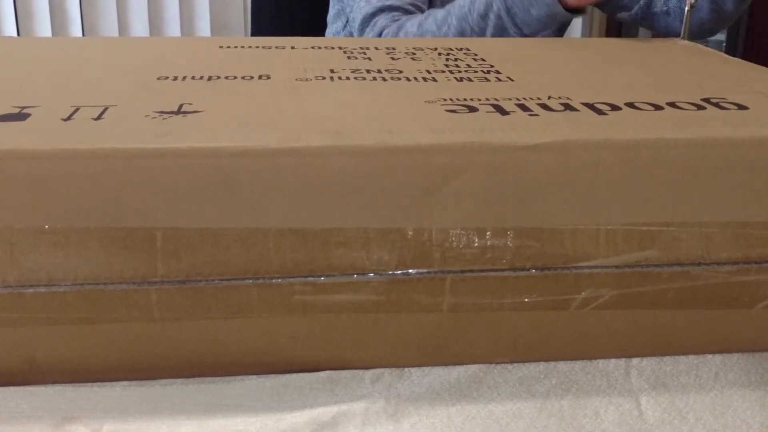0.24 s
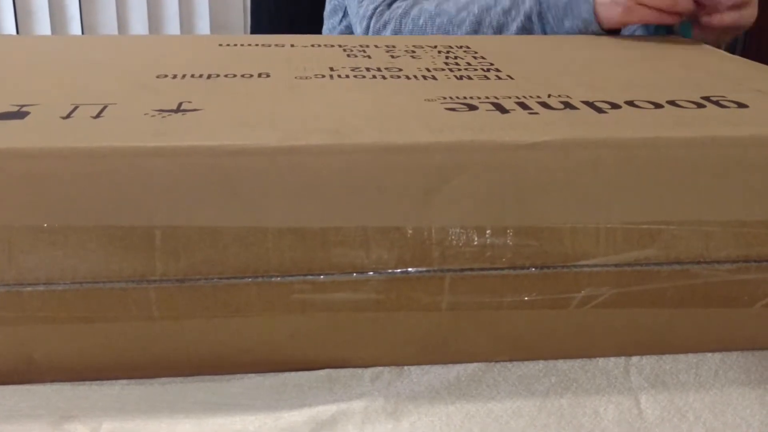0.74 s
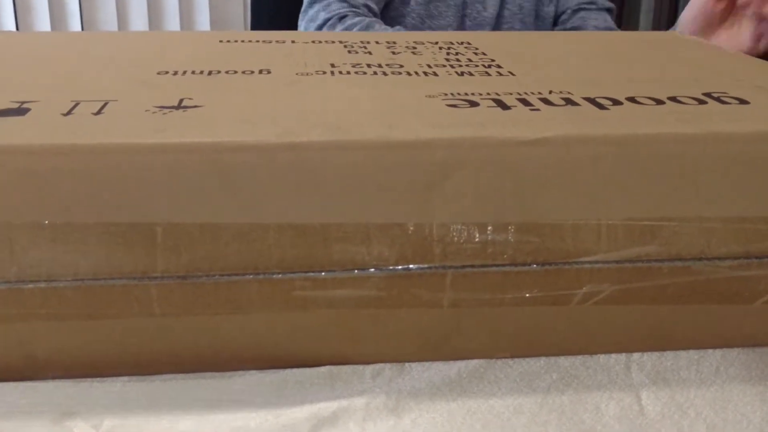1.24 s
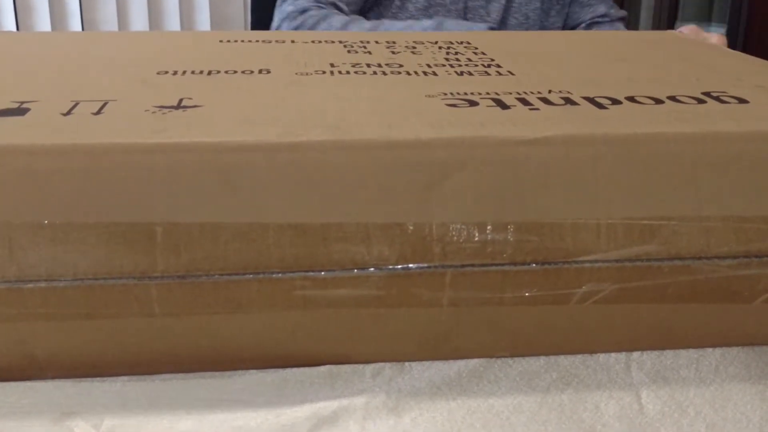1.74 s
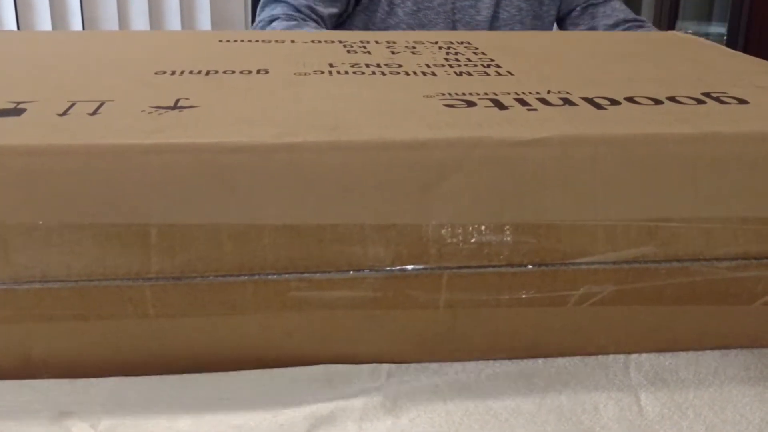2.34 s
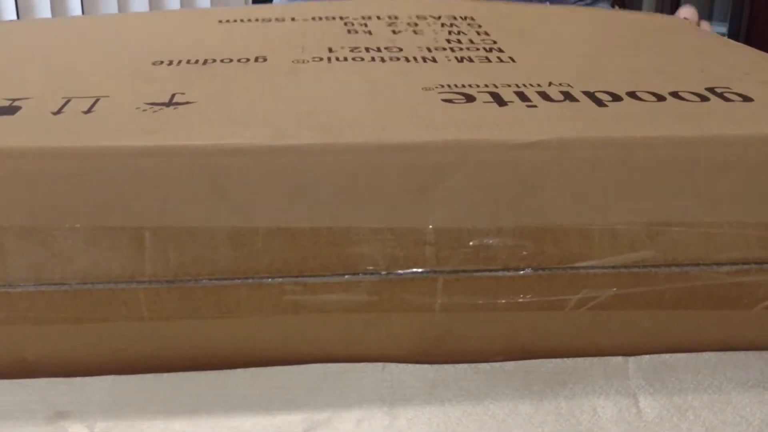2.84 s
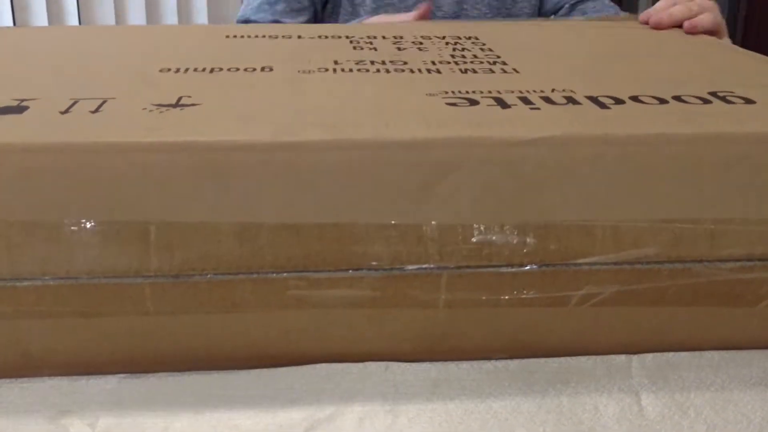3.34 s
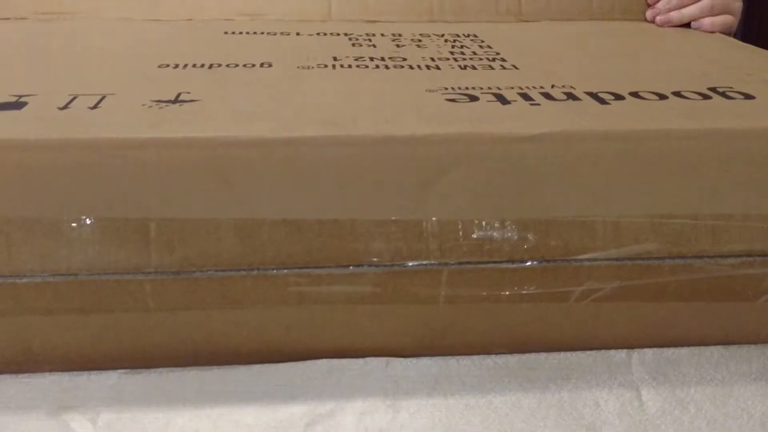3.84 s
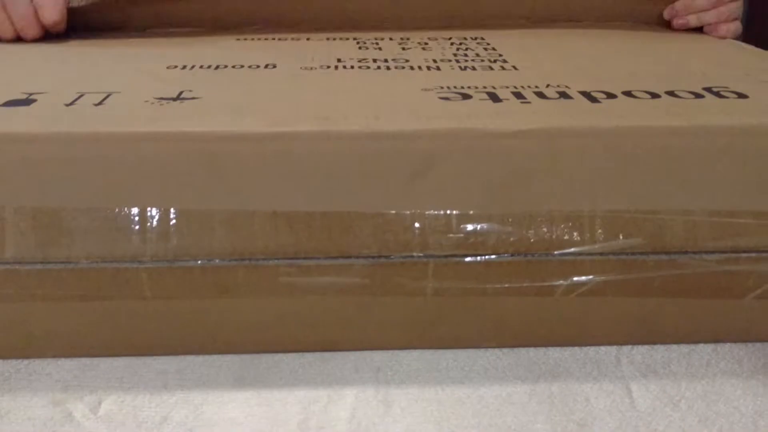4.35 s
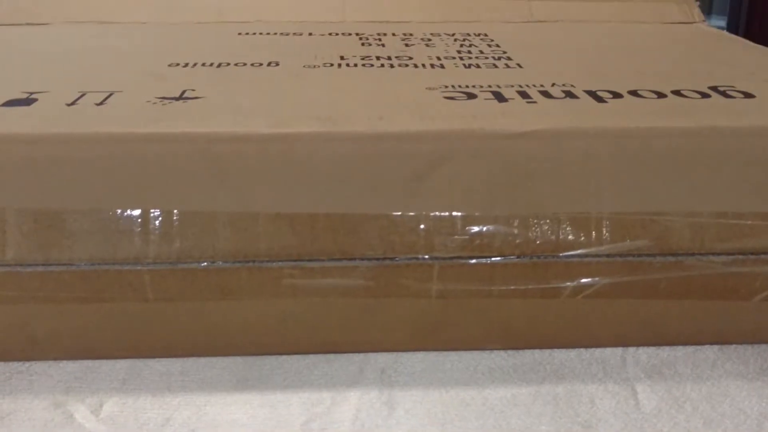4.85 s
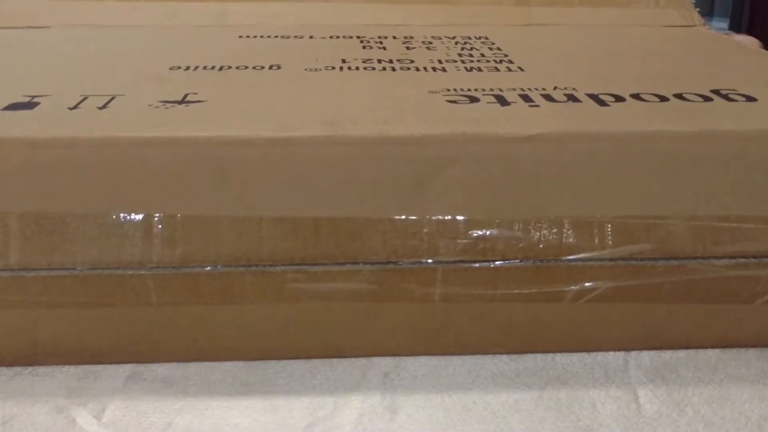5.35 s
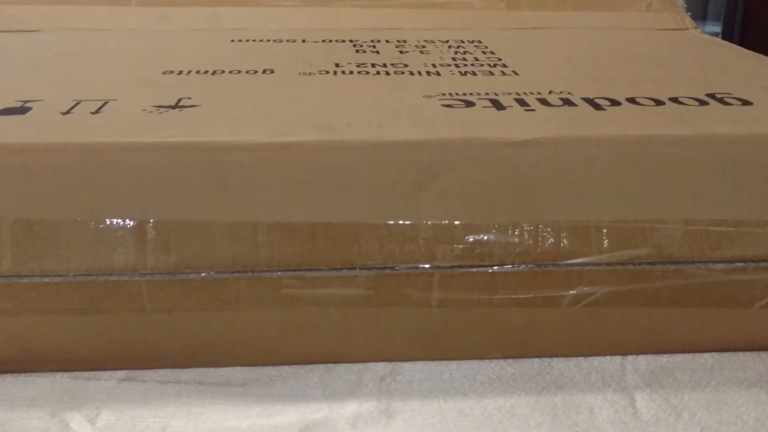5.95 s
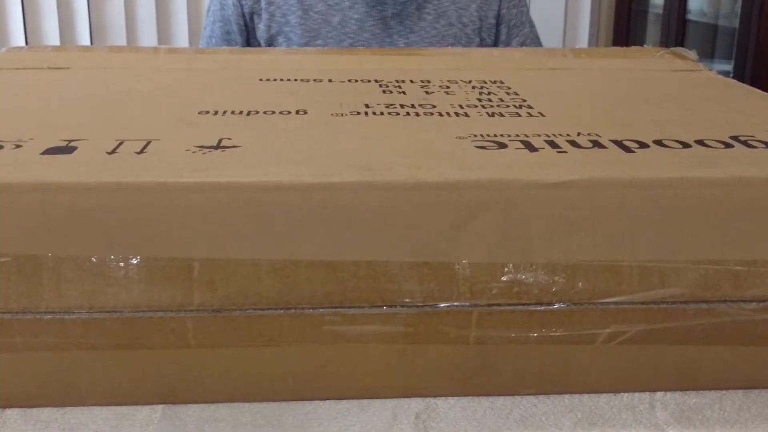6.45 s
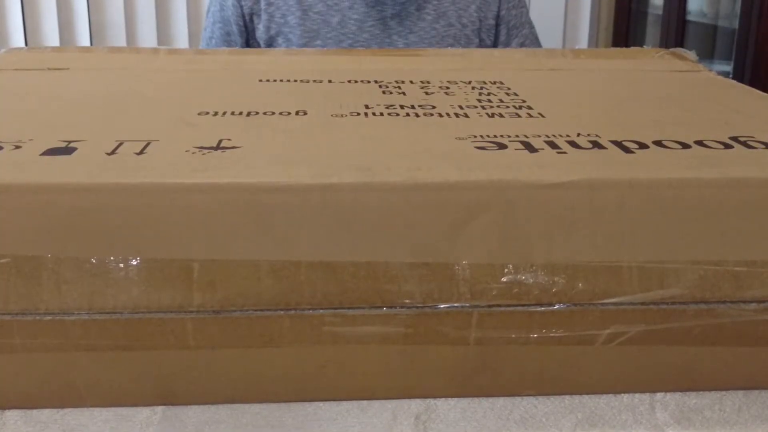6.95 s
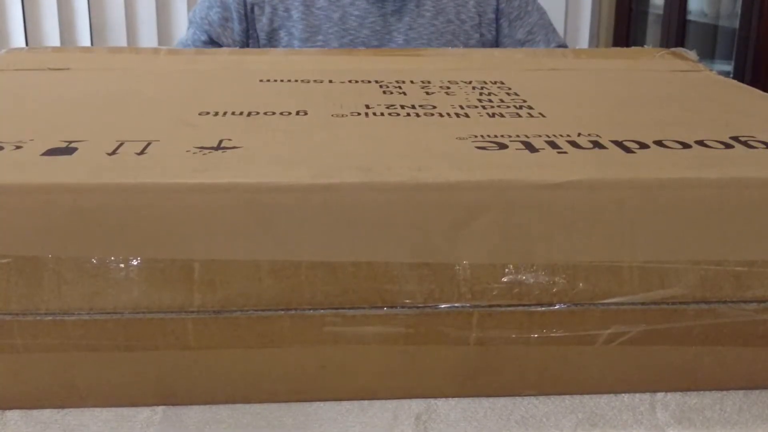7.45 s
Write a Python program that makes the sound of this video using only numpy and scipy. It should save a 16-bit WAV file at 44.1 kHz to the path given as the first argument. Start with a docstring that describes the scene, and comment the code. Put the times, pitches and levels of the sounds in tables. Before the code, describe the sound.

Close cardboard rubbing, a metal tool set down, then packing tape crackles and rips as box flaps creak and scrape open.

```python
"""A faint rub on cardboard rises to a squeak and a few bumps, then a steel tool clatters onto a table.
Hands are opening a taped box in a small room, close to a camera's two microphones. The board rubs in
countless tiny slips and booms when bumped; the tape crackles, snaps and tears; a flap groans as it
sticks and slips, then scrapes open. Behind it lie room tone, a thin electrical whine and a short echo.
The camera widens its stereo image by cross-feeding the microphones."""
import sys
import numpy as np
from scipy import signal
from scipy.fft import rfft, irfft, next_fast_len
from scipy.io import wavfile
from scipy.ndimage import uniform_filter1d, map_coordinates

SR = 44100
rng = np.random.default_rng(int(sys.argv[2]) if len(sys.argv) > 2 else 0)


def inscribe(sig):
    """Save sig as 16-bit PCM at rate SR to the path in sys.argv[1].

    A 1-D sig is mono; a 2-D sig holds one channel per row.
    Samples are clipped to [-1, 1] before scaling.
    """
    pcm = np.round(np.clip(np.atleast_2d(sig).T, -1, 1) * 32767)
    wavfile.write(sys.argv[1], SR, pcm.astype(np.int16))


N = 339129

# Noise spectra. Each row: frequency in Hz, relative density in dB.
ROOM_TONE_SPECTRUM = [(25, -4), (80, -2.5), (140, 6.5), (260, 4.5), (540, -2.5), (1050, -5.5),
                      (1400, -13.5), (2000, -15), (2900, -9.5), (3500, -20.5), (7000, -19), (11000, -26),
                      (15000, -31)]
SHIFT_SPECTRUM = [(100, -16), (220, -2), (300, -23), (410, -1.5), (520, -26), (1200, -46), (4000, -58)]  # the hollow box moving on the table
THUD_SPECTRUM = [(120, -16), (330, -8.5), (480, -6.5), (590, 4), (850, -12), (1300, -16), (2500, -16.5),
                 (6000, -54.5)]  # the table's dull body
CLATTER_SPECTRUM = [(200, -5), (700, -7.5), (1100, -7), (1600, 2.5), (2100, -2), (2800, -3.5),
                    (6000, -52.5)]  # tool against table
CLINK_SPECTRUM = [(1200, -32.5), (2400, 1), (3100, -5), (3900, 0.5), (5300, -9.5), (6600, -11),
                  (8000, -21.5), (15000, -32.5)]  # bright steel
TIP_SPECTRUM = [(1000, -26.5), (3000, -19), (3800, 3.5), (4150, 10), (4700, -14.5), (8000, -27),
                (15000, -33.5)]  # the tool's tip leaving the tape
FOLD_SPECTRUM = [(150, 7.5), (700, 7.5), (1900, -3.5), (3000, -21), (8000, -25)]  # a crease giving way
BOARD_SPECTRUM = [(100, -17), (300, -2), (550, 2), (800, -3), (1300, -5), (1800, -6.5), (2600, -24),
                  (4500, -26.5), (9000, -74.5)]  # cardboard rubbed or slapped
TAPE_SPECTRUM = [(700, -33), (1700, -2.5), (2700, -2.5), (4300, 4.5), (6000, -3), (7500, -7), (9500, -12),
                 (15000, -29)]  # tape rasping
PEEL_SPECTRUM = [(3000, -35), (6000, -1), (8500, -3.5), (12500, -5), (14500, -10.5), (16000, -6.5)]  # glue letting go

# A faint electrical whine. Each row: frequency in Hz, level in dB.
WHINE_TONES = [(5000, -68), (6000, -63), (7000, -66.5), (8335, -72), (10000, -75)]
# The background drops near 0.8 s and slowly creeps back. Each row: time in seconds, gain in dB.
BACKGROUND_GAIN = [(0, 1), (.78, 2.5), (1.05, -11), (1.5, -16.5), (3.8, -10.5), (5.9, 1), (7.69, 2.5)]
# The small room's echo. Each row: frequency in Hz, seconds to fall 60 dB.
ROOM_DECAY = [(120, 0.58), (500, 0.42), (1500, 0.28), (4000, 0.34), (12000, 0.2)]
# Table top and steel tool ringing. Each row: frequency in Hz, level in dB, seconds to fall 60 dB.
TABLE_MODES = [(335, -10, .42), (532, -2, .1), (592, -1, .075), (655, -4, .06), (765, -13, .09),
               (925, -9, .07), (1100, -13, .1), (1290, -8, .07)]
TOOL_MODES = [(1287, -8, .08), (1873, -6, .07), (2840, -4, .06), (2972, -3, .095), (3050, -13, .11),
              (3720, -14, .2), (5500, -22, .2), (6470, -21, .16)]
# The box's air cavity and panels. Each row: frequency in Hz, width in Hz, level in dB.
BOX_MODES = [(84.2, 200, -21.5), (140.5, 21, -3), (192.5, 16, -4.5), (244, 30, -3), (358, 62, -16)]

# The tool meets the table. Each row: start in seconds, relative levels of clatter, thud, tool ring
# and clink in dB, contact time in seconds.
TOOL_KNOCKS = [(0.7961, -7, -14.5, -14.5, -27, .0002), (0.818, -32, -22, -32, -48, .002),
               (0.8953, -4.5, -38, -27, -18, .0018), (0.9065, -3, -24, -24, -17, .0002),
               (0.976, -19, -36.5, -35, -40, 0.0035), (1.081, -40, -48, -47, -50, .004),
               (1.096, -31, -32.5, -52, -60, 0.006), (1.145, -33, -38.5, -56, -66, 0.005),
               (1.187, -29, -35, -56, -63, 0.0045), (1.305, -50, -47, -75, -74, 0.01),
               (1.8145, -40, -29.5, -55, -63, .003), (2.0976, -20.5, -25.5, -41, -56, 0.003)]
# Folds ticking as the flaps bend. Each row: start in seconds, relative level in dB.
FOLD_TICKS = [(3.851, -40), (3.937, -36.5), (3.981, -38), (4.006, -33), (4.112, -32), (4.13, -32),
              (4.153, -31.5), (4.179, -38), (4.22, -30.5), (4.248, -34), (4.394, -32.5), (4.454, -28),
              (4.461, -30.5), (4.516, -30), (6.098, -17), (6.2064, -23)]
# Blows and buckles of the box. Each row: start in seconds, relative slap level in dB, slap pitch in Hz,
# relative levels of thump and crack in dB, seconds for slap and crack to fall 60 dB.
BOX_BUMPS = [(0.461, -16.5, 684, -39.5, -32, 0.25), (0.523, -17.5, 361, -36.5, -37, 0.17),
             (0.589, -21.5, 474, -40, -26.5, 0.28), (2.493, -20.5, 990, -38, -29.5, 0.26),
             (2.948, -21, 1460, -56, -35, 0.15), (3.084, -39, 400, -49.5, -37, 0.22),
             (3.214, -16.5, 1100, -43, -29.5, 0.088), (3.306, -18, 300, -38, -32, 0.13),
             (3.322, -26, 320, -38, -25, 0.16), (3.624, -12.5, 1720, -44, -42, 0.019),
             (3.632, -18, 1800, -49.5, -47, 0.0088), (3.862, -29, 574, -49.5, -45, 0.15),
             (3.934, -33, 694, -49.5, -52, 0.19), (4.235, -22.5, 696, -45, -60, 0.073),
             (4.858, -32, 1120, -72, -56, 0.2), (5.334, -16, 300, -39.5, -41, 0.07),
             (5.358, -5, 740, -58, -35, 0.13), (5.364, -10, 900, -46.5, -22.5, 0.35),
             (5.72, -31, 721, -46, -40, 0.25), (6.153, -24, 516, -39.5, -54, 0.15),
             (6.2025, -34, 404, -36.5, -42, 0.044), (7.261, -21, 338, -48, -40, 0.13),
             (7.385, -21.5, 380, -57, -44, 0.087), (7.42, -25.5, 620, -65, -50, 0.078),
             (7.482, -17.5, 360, -33, -42, 0.086), (7.502, -32, 260, -43.5, -49, 0.12)]
# Tape and fibres snapping. Each row: start in seconds, relative level in dB, pitch in Hz.
TAPE_SNAPS = [(0.589, -23.5, 3780), (2.6231, -18.5, 3960), (2.7065, -22, 5670), (2.8303, -23, 6000),
              (2.842, -16, 5500), (2.846, -13.5, 5670), (2.8535, -17, 5600), (2.8728, -16, 6300),
              (2.8894, -13, 9000), (2.9482, -12, 3650), (3.308, -20, 6000), (3.5403, -13.5, 6200),
              (3.6262, -3.5, 4400), (3.6329, 4.5, 4500), (3.8669, -18.5, 5800), (4.073, -21.5, 6200),
              (4.3605, -15, 5300), (5.016, -18.5, 4000), (7.138, -22.5, 7300)]
# A squeaky rub and a dragged flap, both falling. Each row: time in seconds, pitch in Hz, level in dB.
SQUEAK_GLIDE = [(0.35, 1244, -50.5), (0.405, 1119, -47.5), (0.43, 1071, -31.5), (0.455, 829, -43),
                (0.47, 709, -27), (0.51, 630, -55.5)]
GROAN_GLIDE = [(3.528, 240, -35), (3.536, 215, -21), (3.552, 160, -27), (3.58, 138, -18), (3.605, 130, -22),
               (3.63, 120, -31)]
# Hands, tape and flaps sliding on the box. Each row: start, attack and length in seconds, relative
# mid-stroke levels of rub, rasp and flex in dB, sizzle over the rasp in dB, swell start to end in dB.
SLIDING_STROKES = [(0, 0.0029, 0.3, -47, -63, -64, -19, -18),
                   (0.356, 0.088, 0.075, -30.5, -45.5, -56, -13, 6.5),
                   (0.471, 0.022, 0.25, -39.5, -48.5, -59, -12, 6),
                   (1.814, 0.076, 0.36, -59.5, -58.5, -68, -9.5, -7.5),
                   (2.195, 0.046, 0.43, -46.5, -54, -61, -5.5, 4),
                   (2.688, 0.016, 0.11, -47, -52.5, -59, -2, -11),
                   (2.827, 0.014, 0.15, -40.5, -42.5, -60.5, -1.5, 1.5),
                   (2.981, 0.06, 0.42, -40, -46, -54, -4, 3), (3.405, 0.062, 0.15, -45, -54, -50.5, 5, 7.5),
                   (3.645, 0.02, 0.23, -54, -58, -77, -4, -5),
                   (4.004, 0.022, 0.49, -46.5, -55, -56, 0.5, -5.5),
                   (4.41, 0.097, 0.21, -43.5, -47, -69, -5, -3.5),
                   (4.857, 0.01, 0.36, -46.5, -56.5, -61.5, -7.5, 9),
                   (5.093, 0.14, 0.27, -33.5, -34, -62, -2, 5),
                   (5.32, 0.029, 0.074, -27.5, -30.5, -48.5, -24, 6),
                   (5.423, 0.04, 0.38, -47.5, -53, -62, 2, -0.5),
                   (5.995, 0.05, 0.057, -32, -37.5, -46, -3, -0.5),
                   (6.063, 0.037, 0.14, -40, -48, -54.5, -3, 9),
                   (7.302, 0.0064, 0.011, -48, -40.5, -55, -4, -6.5),
                   (7.365, 0.058, 0.16, -49.5, -55, -64, 1, 1),
                   (7.546, 0.054, 0.16, -35.5, -46.5, -44.5, -2.5, 10)]

# The two microphones differ more in the treble. Each row: frequency in Hz, side gain in dB.
MIC_SPREAD = [(60, -6.5), (140, -14), (280, -18), (550, -8.5), (1000, -3.5), (1700, 0), (3000, -1),
              (15000, 1)]
# Their balance. Each row: frequency in Hz, left over right in dB.
MIC_BALANCE = [(100, -0.5), (300, 5), (1200, -0.5), (2500, 7), (4500, -6), (8000, -1.5), (13000, -2)]


def amp(db):
    """Decibels to gain."""
    return 10 ** (np.asarray(db) / 20)


def unit(x):
    """Scale so that the first channel has rms 1."""
    return x / np.sqrt(np.mean(x[0] ** 2) + 1e-20)


def along(points, hz):
    """(Hz, value) points read on a log axis."""
    freqs, values = np.transpose(points)
    return np.interp(np.log(hz + 1), np.log(freqs), values)


def curves(rows):
    """One value per sample for each column after the time."""
    times, *columns = np.transpose(rows)
    return [np.interp(np.arange(N) / SR, times, column) for column in columns]


def wobble(rate):
    """A smooth random curve with rate knots a second."""
    return map_coordinates(rng.standard_normal(int(N * rate / SR) + 4), [np.arange(N) * rate / SR])


def filtered(x, response):
    """x through a complex frequency response."""
    n = x.shape[-1]
    padded = 2 * next_fast_len(n // 2 + 4096)
    return irfft(rfft(x, padded) * response(np.fft.rfftfreq(padded, 1 / SR)), padded)[..., :n]


def colour(points):
    """Causal response of unit power with the given spectrum."""
    def response(hz):
        cepstrum = irfft(np.log(amp(along(points, hz))))
        half = len(cepstrum) // 2
        cepstrum[1:half] *= 2
        cepstrum[half + 1:] = 0
        return unit(np.exp(rfft(cepstrum))[None])[0]
    return response


def add(track, at_s, sound):
    """Mix a sound in at the given time."""
    start = round(at_s * SR)
    track[:, start:start + sound.shape[1]] += sound[:, :N - start]


def burst(response, t60, window=0.016, attack=0):
    """A dying puff of coloured noise, with the energy of rms 1 held for window seconds."""
    t = np.arange(SR // 3) / SR
    onset = np.minimum((t + 1 / SR) / max(attack, 1 / SR), 1)
    decay = amp(-60 * t / max(t60, .001))
    puff = filtered(rng.standard_normal((2, len(t))) * onset * decay, response)
    return puff / np.sqrt(np.sum(puff ** 2, axis=1, keepdims=True) / (window * SR))


def impulses(per_s, scatter_db):
    """Random clicks of uneven size and either sign, rms 1."""
    hits = rng.random(N) < per_s / SR
    sizes = amp(scatter_db * np.minimum(rng.exponential(size=N), 3))
    return unit(hits * sizes * rng.choice([-1, 1], (2, N)))


def friction(response, slips_per_s, smooth_share):
    """Countless tiny slips over a smooth rush, rms 1."""
    share = np.clip(smooth_share, 0, 1)
    slips = np.sqrt(1 - share) * impulses(slips_per_s, scatter_db=4)
    rush = np.sqrt(share) * rng.standard_normal((2, N))
    return unit(filtered(slips + rush, response))


def stroke(start, attack, length, swell_db, release_db_per_s=232):
    """Gain of one stroke: it gets going, swells or fades steadily, and dies when the hand stops."""
    t = np.arange(N) / SR - start
    onset = np.sin(np.pi / 2 * np.clip(t / attack, 0, 1)) ** 2
    hold_db = swell_db * (np.clip(t / length, 0, 1) - .5)
    release_db = -release_db_per_s * np.clip(t - length, 0, .5)
    return onset * amp(hold_db + release_db)


def background():
    """Room tone drops near 0.8 s and slowly creeps back; the thin whine in it drops further."""
    t = np.arange(N) / SR
    air = amp(-48) * filtered(rng.standard_normal((2, N)), colour(ROOM_TONE_SPECTRUM))
    whine = np.zeros((2, N))
    for hz, db in WHINE_TONES:
        phase = rng.uniform(0, 2 * np.pi, (2, 1)) + 0.4 * wobble(25)
        whine += amp(db) * np.sin(2 * np.pi * hz * t + phase)
    gain_db, = curves(BACKGROUND_GAIN)
    return amp(gain_db) * air + amp(1.6 * gain_db) * whine


def room_echo(sound):
    """The near walls answer the mid channel; each frequency dies at its own speed."""
    hz, t, noise = signal.stft(rng.standard_normal((2, SR * 2 // 3)), SR, nperseg=256)
    decay = amp(-60 * t / along(ROOM_DECAY, hz)[:, None])
    tail = signal.istft(noise * decay, SR, nperseg=256)[1]
    tail *= 1 - np.exp(-np.arange(tail.shape[1]) / SR / 0.0011)
    return signal.fftconvolve(sound[:1], tail / np.linalg.norm(tail[0]), axes=1)[:, :N]


def box_shift():
    """The box moves a little on the table with a soft, hollow rub."""
    rush = filtered(rng.standard_normal((2, N)), colour(SHIFT_SPECTRUM))
    return amp(-61) * stroke(start=1.55, attack=0.044, length=0.075, swell_db=2) * rush


def ring(modes, contact_s, scatter_db):
    """Each contact strikes the modes at new strengths, slightly detuned; mid and side differ in phase."""
    t = np.arange(SR // 2) / SR
    sound = np.zeros((2, len(t)))
    for hz, db, t60 in modes:
        phase = np.array([[0], [rng.uniform(0, 2 * np.pi)]])
        detuned_hz = hz * (1 + .006 * rng.normal())
        envelope = amp(db + scatter_db * rng.normal() - 60 * t / t60)
        sound += envelope * np.sin(2 * np.pi * detuned_hz * t + phase)
    # the rings are thinned out below about 150 Hz
    return filtered(sound * np.minimum(t / contact_s, 1), lambda hz: (1j * hz / (1j * hz + 150)) ** 2)


def tool_knocks():
    """The tool lands, rattles and settles: the table top thuds and rings, the steel rings and clinks."""
    track = np.zeros((2, N))
    for start, clatter_db, thud_db, ring_db, clink_db, contact_s in TOOL_KNOCKS:
        table = amp(thud_db + 1.5) * ring(TABLE_MODES, contact_s, scatter_db=1.5)
        thud = amp(thud_db - 1) * burst(colour(THUD_SPECTRUM), t60=0.05, attack=contact_s)
        steel = amp(ring_db) * ring(TOOL_MODES, contact_s, scatter_db=1)
        clatter_t60 = 0.0053 + 4 * contact_s
        clatter = amp(clatter_db - 11.5) * burst(colour(CLATTER_SPECTRUM), clatter_t60, attack=contact_s)
        clink = amp(clink_db) * burst(colour(CLINK_SPECTRUM), t60=0.054, attack=contact_s)
        corner_hz = 9 / contact_s  # a soft contact mutes vibrations that fit over nine cycles into it
        for part in (table, thud, steel, clatter, clink):
            add(track, start, filtered(part, lambda hz: 1 / (1 + 1j * hz / corner_hz) ** 2))
    return track


def tip_click():
    """The tool's tip clicks free of the tape."""
    track = np.zeros((2, N))
    add(track, 0.4748, amp(-17) * burst(colour(TIP_SPECTRUM), t60=0.014, window=0.0027))
    return track


def fold_creak():
    """Each slip of a fold is a dry tick with a brief shudder of the board."""
    track = np.zeros((2, N))
    for start, db in FOLD_TICKS:
        fold = colour([(hz * 2 ** (.1 * rng.normal()), level) for hz, level in FOLD_SPECTRUM])
        add(track, start, amp(db + 1) * burst(fold, t60=.003, window=.0006))
        add(track, start, amp(db - 8) * burst(fold, t60=.04, window=.0005))
    return track


def rub_squeak(width_hz=330):
    """A long rub drives one narrow, falling resonance at random."""
    hz, db = curves(SQUEAK_GLIDE)
    t = np.arange(N) / SR
    phase = 2 * np.pi * np.cumsum(hz) / SR
    resonance = [wobble(width_hz) * np.cos(phase) + wobble(width_hz) * np.sin(phase) for _ in range(2)]
    gate = (t > SQUEAK_GLIDE[0][0]) & (t < SQUEAK_GLIDE[-1][0])
    return amp(db) * gate * np.array(resonance)


def flap_groan():
    """The dragged flap sticks and slips ever more slowly; the panels follow until the tape parts."""
    hz, db = curves(GROAN_GLIDE)
    t = np.arange(N) / SR
    phase = 2 * np.pi * np.cumsum(hz * (1 + .04 * wobble(60))) / SR
    fundamental = (1 + .4 * wobble(220)) * np.sin(phase)
    octave = amp(-12) * wobble(200) * np.sin(2 * phase)
    gate = uniform_filter1d(1. * (t > GROAN_GLIDE[0][0]) * (t < GROAN_GLIDE[-1][0]), size=200)
    return np.array([amp(db) * gate * (fundamental + octave)] * 2)


def box_resonance(hz):
    """Unit-power response of the box's air cavity and panels, the modes alternating in sign."""
    response = sum((-1) ** k * amp(db) * 1j * hz * width / (centre ** 2 - hz ** 2 + 1j * hz * width)
                   for k, (centre, width, db) in enumerate(BOX_MODES))
    return unit(response[None])[0]


def struck_spot(pitch_hz, focus_db=11):
    """The stiffness of the struck spot favours one part of the board's range."""
    return colour([(hz, db - focus_db * min(abs(np.log2(hz / pitch_hz)), 1))
                   for hz, db in BOARD_SPECTRUM])


def box_bumps(crumple_s=0.0015):
    """A blow slaps the soft, yielding board, booms in the box and cracks its taped skin."""
    track = np.zeros((2, N))
    for start, slap_db, pitch_hz, thump_db, crack_db, t60 in BOX_BUMPS:
        slap = struck_spot(pitch_hz)
        add(track, start, amp(slap_db - 15.5) * burst(slap, t60, attack=crumple_s))
        add(track, start, amp(slap_db - 10) * burst(slap, t60=0.063, window=0.0019, attack=crumple_s))
        add(track, start, amp(thump_db + 14.5) * burst(box_resonance, t60=0.073))
        add(track, start, amp(crack_db - 6.5) * burst(colour(TAPE_SPECTRUM), t60, attack=crumple_s))
        add(track, start, amp(crack_db - 16) * burst(colour(PEEL_SPECTRUM), t60))
    return track


def tape_snaps():
    """Glue and fibres let go in very short, bright clicks."""
    track = np.zeros((2, N))
    for start, db, hz in TAPE_SNAPS:
        spectrum = [(hz / 8, -14), (hz / 2, -16), (hz * 0.75, -11), (hz, 0),
                    (hz * 1.45, -9), (hz * 2, -16), (hz * 4, -21)]
        add(track, start, amp(db - 11) * burst(colour(spectrum), t60=0.003, window=0.00087))
    return track


def tape_crackle(rasp_gain):
    """Stressed tape ticks at random: louder when rubbed, faint and following the background at rest."""
    ticks = impulses(per_s=70, scatter_db=3.5)
    rubbed = amp(-11.5) * rasp_gain * ticks
    resting = amp(-69 + curves(BACKGROUND_GAIN)[0]) * ticks
    tape = filtered(rubbed, colour(TAPE_SPECTRUM))
    glue = filtered(.5 * rubbed + resting, colour(PEEL_SPECTRUM))
    return tape + glue


def tape_tear(start_s=3.53, end_s=3.634, growth_db_per_s=107):
    """Strained tape rips with growing force and stops dead when it parts."""
    t = np.arange(N) / SR
    force = amp(-31 - growth_db_per_s * np.abs(end_s - t)) * (t > start_s) * (t < end_s)
    rip = friction(colour(TAPE_SPECTRUM), slips_per_s=1400, smooth_share=0.42)
    glue = amp(-3) * friction(colour(PEEL_SPECTRUM), slips_per_s=900, smooth_share=0.4)
    board = amp(-5) * friction(colour(BOARD_SPECTRUM), slips_per_s=340, smooth_share=0.46)
    return force * (rip + glue + board)


def sliding():
    """Each stroke flexes the panels, rubs the board and rasps over tape; peeling glue sizzles."""
    power = np.zeros((4, N))
    for start, attack, length, rub_db, rasp_db, flex_db, sizzle_db, swell_db in SLIDING_STROKES:
        gains = amp([flex_db, rub_db, rasp_db, rasp_db + sizzle_db])
        power += np.outer(gains, stroke(start, attack, length, swell_db)) ** 2
    hand_pressure = amp(2.3 * wobble(24))
    flex, rub, rasp, sizzle = np.sqrt(power) * hand_pressure
    # slow strokes catch and crackle; fast ones merge into an even scrape
    speed = rasp / (rasp + amp(-54))
    grip = amp(3.3 * (1 - speed) * wobble(55))
    panels = amp(10) * flex * friction(box_resonance, slips_per_s=450, smooth_share=0.42)
    board = amp(-4.5) * rub * friction(colour(BOARD_SPECTRUM), slips_per_s=200,
                                       smooth_share=(1 + 2 * speed) / 3)
    tape = amp(0.5) * rasp * friction(colour(TAPE_SPECTRUM), slips_per_s=500, smooth_share=.75 * speed)
    glue = amp(1) * sizzle * friction(colour(PEEL_SPECTRUM), slips_per_s=1100, smooth_share=0.82)
    return grip * (panels + board + tape + glue) + tape_crackle(rasp * (1 - speed / 2))


def scene():
    """All sources mixed as mid and side, then heard left and right by the close pair of microphones."""
    tool = tool_knocks() + tip_click()
    box = box_bumps() + fold_creak()
    snaps = tape_snaps()
    rubs = sliding() + rub_squeak() + tape_tear() + box_shift()
    echo = room_echo(amp(-7) * tool + amp(-14.5) * box + amp(-18) * snaps + amp(-10.5) * rubs)
    mid, side = tool + box + snaps + rubs + flap_groan() + echo + background()
    side = filtered(side, lambda hz: amp(along(MIC_SPREAD, hz)))
    left_right = np.array([mid + side, mid - side])
    return filtered(left_right, lambda hz: amp(along(MIC_BALANCE, hz) * np.array([[.5], [-.5]])))


def record(dry):
    """The camera widens the image, clips peaks and cuts the top treble; an edit leaves a brief gap."""
    lag_s, top_hz = 1 / 2286, 15200
    gap_start_s, gap_end_s = 6.215, 6.272
    # Each row: frequency in Hz, share of the other channel.
    feed = [(100, .87), (1100, .95), (2350, .96), (3400, .65), (4500, .42), (7000, .22), (15000, .15)]
    # each channel loses a delayed copy of the other, which combs mid and side in turn
    crossed = filtered(dry[::-1], lambda hz: along(feed, hz) * np.exp(-2j * np.pi * hz * lag_s))
    wide = (dry - crossed) / np.sqrt(2)
    t = np.arange(N) / SR
    in_gap = (t > gap_start_s) & (t < gap_end_s)
    gain = uniform_filter1d(np.where(in_gap, amp(-36.5), 1), size=120)
    overloaded = np.clip(wide * gain, -1, 1)
    return filtered(overloaded, lambda hz: 1 / (1 + (hz / top_hz) ** 80))


dry = scene()
out = record(dry)
inscribe(out)
```